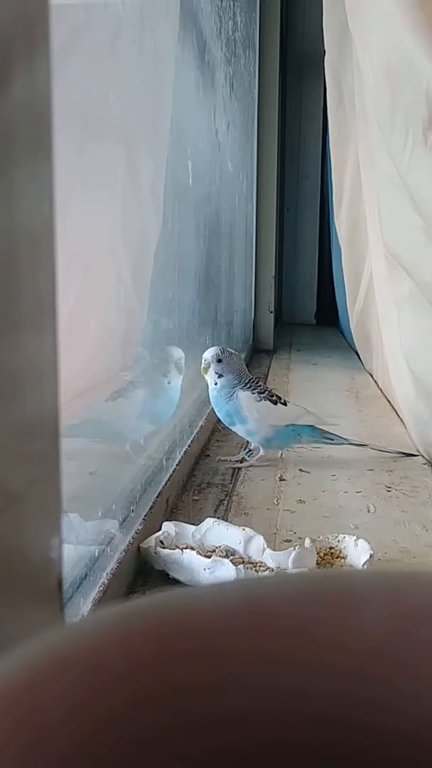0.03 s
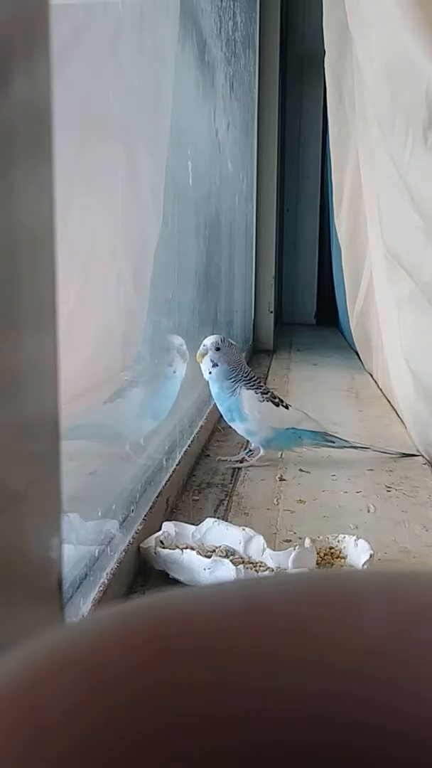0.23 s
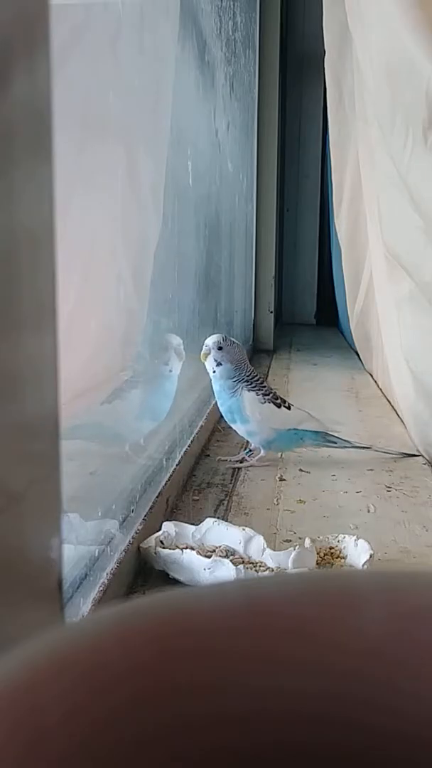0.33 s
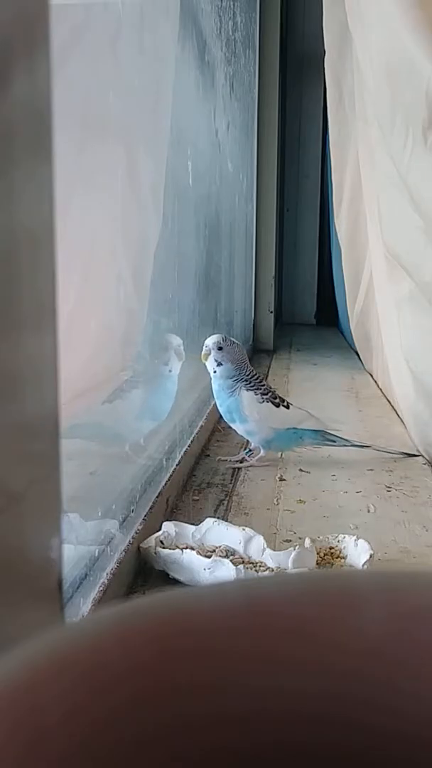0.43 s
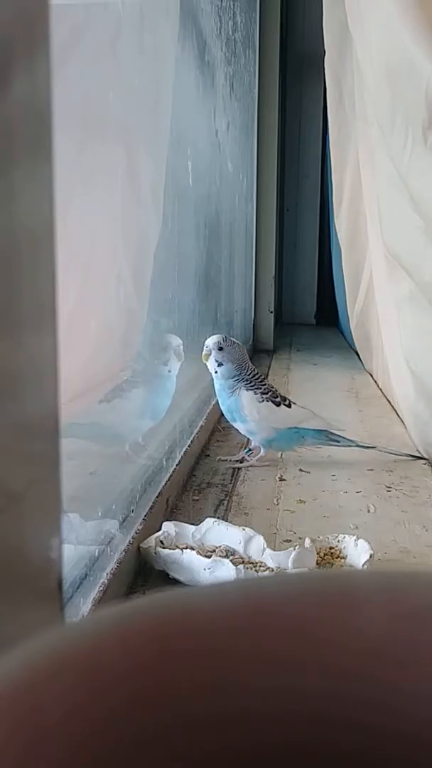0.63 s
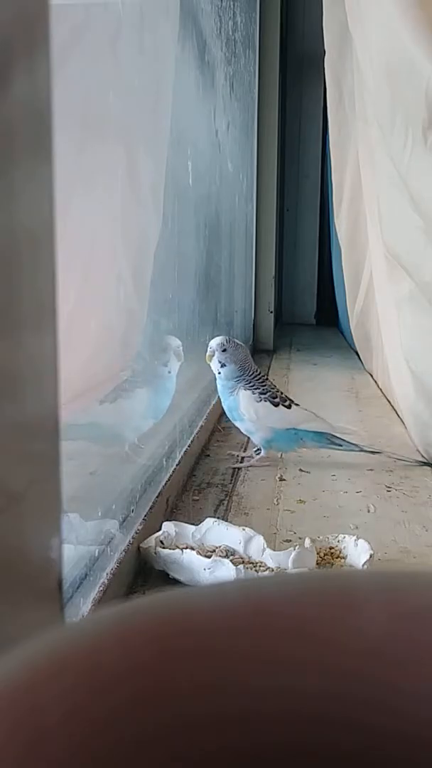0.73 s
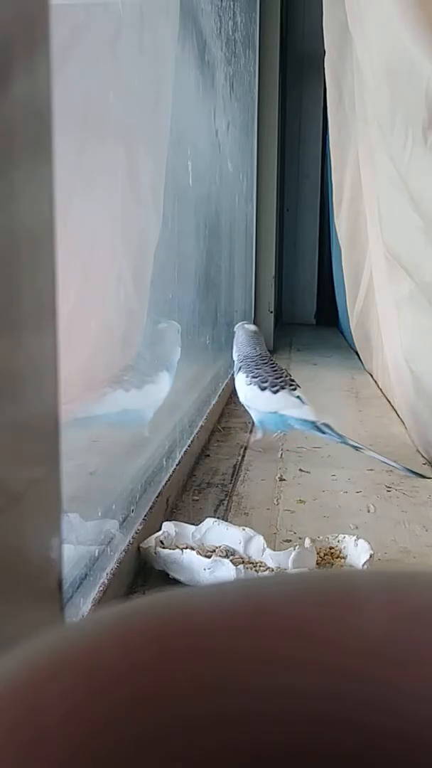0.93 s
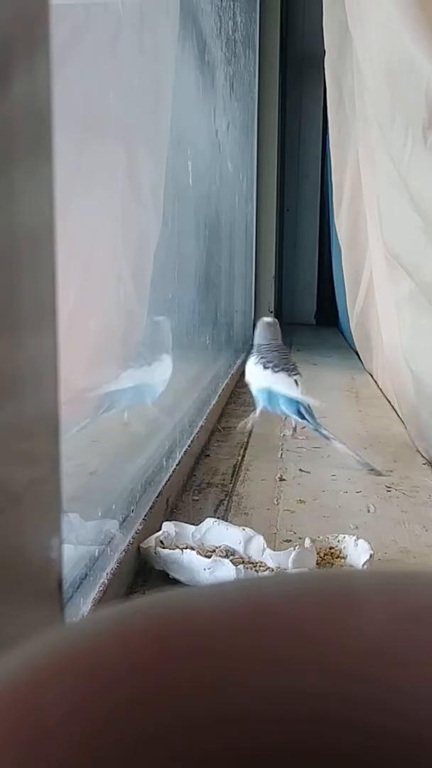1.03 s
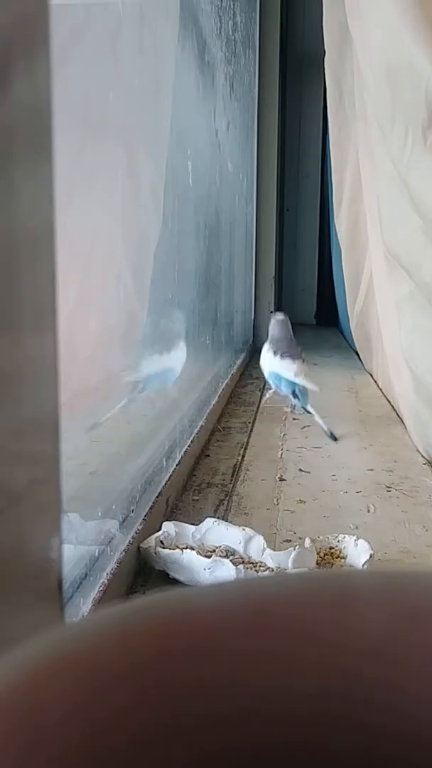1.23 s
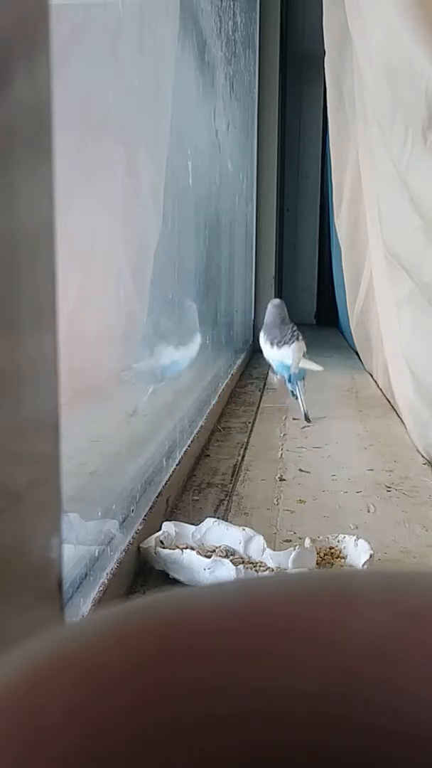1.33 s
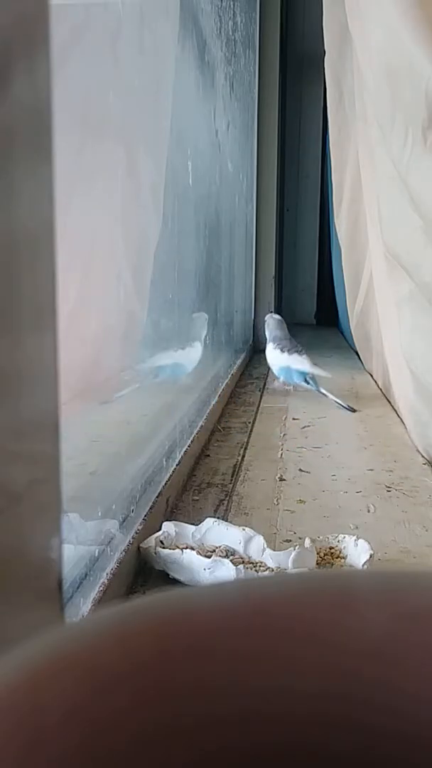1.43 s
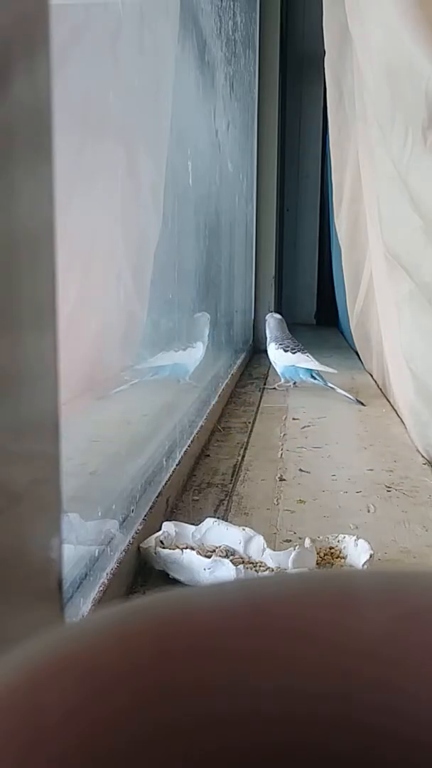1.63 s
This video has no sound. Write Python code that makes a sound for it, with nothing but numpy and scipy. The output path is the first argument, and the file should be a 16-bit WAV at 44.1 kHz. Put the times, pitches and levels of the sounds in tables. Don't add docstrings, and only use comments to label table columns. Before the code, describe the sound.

Two piercing parakeet chirps near the microphone, then faint claw ticks on a window sill.

```python
import sys
import numpy as np
from scipy import signal
from scipy.fft import rfft, irfft
from scipy.io import wavfile
from scipy.ndimage import uniform_filter1d, minimum_filter1d

SR = 44100
rng = np.random.default_rng(int(sys.argv[2]) if len(sys.argv) > 2 else 0)


def to_wav(s):
    ch = np.atleast_2d(s).T
    pcm = np.round(np.clip(ch, -1, 1) * 32767)
    wavfile.write(sys.argv[1], SR, pcm.astype(np.int16))


def level_to_linear(level):
    exponent = np.asarray(level, float) / 20
    return 10 ** exponent


N = 74970


def level(x, db):
    return x * level_to_linear(db) / np.sqrt(np.mean(x ** 2))


def band(x, hz, width_hz):
    return signal.lfilter(*signal.iirpeak(min(hz, .45 * SR), hz / width_hz, fs=SR), x)


def noise_band(n, hz, width_hz):
    return band(band(rng.standard_normal(n), hz, width_hz), hz, width_hz)


def walk(rate_hz):
    k = int(SR / rate_hz)
    steps = np.repeat(rng.standard_normal(N // k + 1), k)
    drift = uniform_filter1d(uniform_filter1d(steps, k), k)[:N]
    return drift / drift.std()


def house():
    # frequency in Hz, level in dB per Hz.
    hiss_spectrum = [(40, -27.5), (240, -6), (1100, -14), (1700, -24.5), (3000, -21.5), (5500, -39),
                     (12500, -40.5), (15500, -51.5)]
    # frequency in Hz, width in Hz, level in dB, flicker in dB.
    hollows = [(240, 53, -75.5, 4), (320.8, 45, -76, 3.5), (1170, 97, -80.5, 9.5), (2150, 230, -81, 4.5),
               (4700, 700, -87, 3.5)]
    # centre in seconds, length in seconds, frequency in Hz, level in dB.
    swells = [(0.019, .05, 1145, -65), (0.047, 0.025, 2256, -67), (0.159, 0.057, 329.3, -59),
              (0.167, 0.023, 918, -67), (0.498, 0.019, 240, -59), (0.546, 0.042, 248, -62.5),
              (.675, 0.016, 323.3, -57), (0.767, 0.063, 238, -51), (0.771, 0.024, 2150, -70.5),
              (.772, .03, 4400, -73.5), (0.839, 0.015, 240, -53), (1.215, 0.011, 873, -56.5),
              (1.258, 0.022, 330, -58), (1.296, 0.02, 243, -54), (1.299, 0.017, 1171, -64.5),
              (1.345, .08, 2157, -68.5), (1.68, 0.062, 1308, -68), (0.739, 0.04, 1137, -73),
              (0.312, 0.054, 328.6, -65), (1.236, 0.097, 81.5, -86.5), (1.477, 0.0059, 1129, -51),
              (1.46, 0.046, 80.3, -76), (1.502, 0.029, 83, -81), (1.518, 0.025, 331, -57),
              (1.59, 0.016, 2040, -60.5), (1.64, 0.087, 2133, -68), (1.636, 0.1, 76.8, -73.5),
              (1.632, 0.088, 125, -71)]
    swell_flicker_db, swell_sway_s = 2, .0002

    t = np.arange(N) / SR
    floor_hz, floor_db = np.array(hiss_spectrum).T
    hiss = 0
    for hz in 45 * 2 ** np.arange(0, 8.6, .5):
        band_db = np.interp(np.log(hz), np.log(floor_hz), floor_db) + 10 * np.log10(hz)
        hiss = hiss + level(noise_band(N, hz, hz / 2), band_db) * level_to_linear(1.2 * walk(36))
    out = level(hiss, -71)
    for hz, width_hz, db, flicker_db in hollows:
        out = out + level(noise_band(N, hz, width_hz) * level_to_linear(flicker_db * walk(4.5)), db)
    for s, length_s, hz, db in swells:
        gain = level_to_linear(db + swell_flicker_db * walk(60)) * np.exp(-(2 * (t - s) / length_s) ** 2)
        out = out + gain * np.sin(2 * np.pi * hz * (t + swell_sway_s * walk(43)))
    return out


def ring(modes):
    t = np.arange(int(SR / 4)) / SR
    out = 0
    for hz, db, t60_s in modes:
        decay = np.exp(-np.log(1000) * t / t60_s)
        onset = (1 - np.exp(-t * hz / 2)) ** 2
        out = out + level_to_linear(db) * np.sin(2 * np.pi * hz * t) * decay * onset
    return out / 2


def taps():
    # start in seconds, peak in dB, brightness from 0 (board) to 1 (claw).
    tap_events = [
        (1.103, -58, .95),
        (1.218, -61, .8),
        (1.283, -54, .95),
        (1.398, -57, .05),
        (1.4365, -36, 0.0),
        (1.4440, -48, 0.0),
        (1.4685, -45, .5),
        (1.478, -54, 0.0),
        (1.499, -57, .2),
        (1.599, -66, .9),
    ]
    # frequency in Hz, level in dB, t60 in seconds.
    sill_modes = [(488, -12, .13), (1100, -14, .07), (1560, -12, .03), (1900, -5, .02), (2250, -4, .02),
                  (2700, 3, .01), (3300, -2, .01), (4000, 0, .01)]
    # frequency in Hz, level in dB, t60 in seconds.
    claw_modes = [(4400, -3, .008), (4650, -15, .12), (4950, -11, .22), (5200, -5, .012), (7500, -12, .008),
                  (14000, -4, .006), (15200, -6, .006)]
    contact_s, scrape_s, scrape_share = .00003, .022, .06

    out = np.zeros(N + SR)
    sill, claw = ring(sill_modes), ring(claw_modes)
    t = np.arange(2000) / SR
    contact = np.exp(-(t / contact_s - 2) ** 2)
    for s, db, bright in tap_events:
        scrape = rng.standard_normal(len(t)) * np.exp(-t / scrape_s) * scrape_share
        hit = signal.fftconvolve((1 - bright) * sill + bright * claw, scrape + contact)
        start = int(s * SR)
        out[start:start + len(hit)] += level_to_linear(db) * hit / np.abs(hit).max()
    return out[:N]


def colour(hz):
    # frequency in Hz, gain in dB.
    throat_curve = [(1050, -30), (1350, -14), (5400, 12.5), (7000, -6), (11000, -7), (12700, -24.5),
                    (14500, -1), (16000, -7.5)]
    curve_hz, db = np.array(throat_curve).T
    return np.interp(np.log(hz), np.log(curve_hz), db)


def smooth(x):
    return uniform_filter1d(x, size=40)


def whistle(notes, tones, unsteady, hiss_db, rough_db, wear):
    wear_kinds = {"growing": (-.7, 1), "rough": (1, 0), "clean": (.1, 0)}
    settled_s = .025
    flutter_db, rasp_db, grain_db = 1.5, -19, 8
    bright_db, top_db = [3, -4], [-6, 6]

    t = np.arange(N) / SR
    wobble, flutter, rasp = walk(300), walk(330), walk(1500)
    bin_hz = np.arange(1, N // 2 + 2) * SR / N
    air = rfft(rng.standard_normal(N)) * level_to_linear(colour(bin_hz)) / (1 + (4200 / bin_hz) ** 6)
    hiss = level(irfft(air, N), hiss_db)
    grain_start, grain_growth = wear_kinds[wear]
    out = 0
    for note, low_db, high_db in zip(notes, bright_db, top_db):
        s, hz, db = np.array(note).T
        glide_hz = np.interp(t, s, hz)
        age = (t - s[0]) / settled_s
        pitch_hz = smooth(glide_hz) * (1 + .008 * wobble * (1 + unsteady * (glide_hz < 2800)))
        phase = 2 * np.pi * np.cumsum(pitch_hz) / SR

        depth_db = flutter_db + rough_db * np.clip(age - .5, 0, 1)
        sounding = (t > s[0]) * (t < s[-1])
        gain = smooth(level_to_linear(np.interp(t, s, db) + depth_db * flutter) * sounding)

        worn = np.clip(grain_start + grain_growth * age, 0, 1)
        slide = np.clip(np.abs(smooth(np.gradient(glide_hz))) * SR / 60000, 0, 1)
        over = 0
        for multiple, tone_db in tones:
            chirp_db = (low_db if multiple < 4 else high_db) * (unsteady > 1)
            slide_db = -20 * slide * (multiple < 1)
            tone_gain = level_to_linear(tone_db + chirp_db + colour(multiple * pitch_hz) + slide_db)
            over = over + tone_gain * np.sin(multiple * phase)
        voice = np.sin(phase) + over * (1 + 2 * level_to_linear(-17.5) * rasp)
        rasped = voice * (1 + level_to_linear(rasp_db + grain_db * worn) * rasp)
        out = out + gain * (rasped + hiss * (.2 + worn))
    return out


def side_tones():
    # centre in seconds, length in seconds, frequency in Hz, level in dB.
    side_events = [
        (.216, .004, 1880, -44),
        (.225, .006, 1850, -36),
        (.233, .005, 1820, -44),
        (.245, .009, 1370, -35),
        (.245, .012, 2010, -33),
        (.244, .007, 4030, -25),
        (.957, .011, 1800, -42),
        (.980, .012, 2050, -32),
        (.979, .008, 4800, -40),
    ]
    t = np.arange(N) / SR
    out = 0
    for s, length_s, hz, db in side_events:
        out = out + level_to_linear(db) * np.exp(-(2 * (t - s) / length_s) ** 2) * np.sin(2 * np.pi * hz * t)
    return out


def bird():
    # time in seconds, pitch in Hz, level in dB.
    fall = [
        [(.212, 3200, -52), (.217, 3350, -25), (.229, 3620, -10), (.235, 3150, -18), (.240, 2760, -8),
         (.246, 2640, -12), (.255, 2680, -19), (.261, 2600, -18), (.263, 2400, -30)],
        [(.940, 3200, -50), (.944, 2950, -34), (.949, 3340, -17), (.957, 3570, -21), (.964, 3550, -8),
         (.974, 2840, -11), (.983, 2715, -1), (.988, 2710, -8), (.993, 2650, -30)],
    ]
    low = [
        [(.261, 2450, -30), (.265, 2080, -13), (.269, 1870, -8), (.274, 1730, -9), (.2765, 1800, -28),
         (.280, 1880, -7), (.2825, 1850, -26), (.285, 1820, -15), (.293, 1850, -32)],
        [(.997, 2600, -32), (1.001, 2340, -10), (1.004, 2050, -14), (1.007, 1890, -8), (1.011, 1850, -23),
         (1.015, 1900, -13), (1.021, 1900, -24), (1.027, 1830, -21), (1.032, 1820, -36)],
    ]
    join = [
        [(.249, 4050, -36), (.251, 4030, -12), (.257, 3800, -19), (.2595, 3730, -5), (.262, 3760, -17),
         (.272, 3630, -11), (.276, 3590, -24), (.281, 3680, -10), (.286, 3620, -26)],
        [(.982, 4000, -38), (.985, 4050, -14), (.990, 3670, -10), (.996, 3280, -14), (1.001, 3240, -22),
         (1.007, 3800, -19), (1.013, 3750, -16), (1.019, 3650, -18), (1.022, 3600, -34)],
    ]
    turn_down = [
        [(.283, 3650, -29.5), (.286, 3400, -7), (.289, 2980, -16.5), (.296, 2850, -10), (.301, 2760, -5.5),
         (.304, 2700, -33.5)],
        [(1.020, 3400, -32), (1.023, 3200, -16.5), (1.028, 2780, -20.5), (1.034, 2980, -11), (1.038, 3000, -20),
         (1.041, 2950, -27)],
    ]
    close = [
        [(.301, 3650, -35), (.305, 3659, -7.5), (.312, 3674, -1.5), (.316, 3651, -12), (.329, 3495, -11),
         (.334, 3650, -9), (.340, 3720, -4.5), (.346, 3638, -18.5), (.362, 3600, -28.5)],
        [(1.038, 3369, -29), (1.041, 3545, -11.5), (1.049, 3652, -12.5), (1.060, 3582, -13), (1.075, 3554, -17),
         (1.090, 3607, -19.5), (1.100, 3490, -38.5)],
    ]
    # multiple of the pitch, level in dB.
    fall_tones = [(.5, -31.5), (2, -41), (3, -47), (4, -54), (5, -53), (6, -57)]
    join_tones = [(2, -34.5), (3, -43.5), (4, -55.5)]
    close_tones = [(.5, -39), (2, -35.5), (3, -43), (4, -52)]

    song = whistle(fall, fall_tones, unsteady=1.3, hiss_db=-50, rough_db=2, wear="growing")
    song = song + whistle(low, fall_tones[1:], unsteady=1.1, hiss_db=-45, rough_db=1.5, wear="rough")
    song = song + whistle(turn_down, join_tones, unsteady=.8, hiss_db=-44.5, rough_db=3, wear="rough")
    song = song + whistle(join, join_tones, unsteady=1.5, hiss_db=-41.5, rough_db=3, wear="rough")
    song = song + whistle(close, close_tones, unsteady=.8, hiss_db=-48.5, rough_db=1.5, wear="clean")
    beak = signal.butter(6, 1480, "high", fs=SR, output="sos")
    song = signal.sosfilt(beak, song)
    return song + side_tones() - .85 * band(song, 12600, 1500)


def room(x):
    # delay in seconds, level in dB.
    early = [(.0013, -13), (.0071, -13), (.0112, -15), (.0143, -16), (.0212, -17)]
    # frequency in Hz, t60 in seconds, level in dB.
    tail_bands = [(516.6, 0.11, -6.5), (1900, 0.32, -9), (2700, 0.38, -2.5), (3650, 0.28, 0),
                  (4400, .2, -4), (5560, 0.16, 1.5), (11300, 0.1, -3.5), (14500, 0.25, 4)]
    tail_db, gap_s = -24, .018

    t = np.arange(int(.7 * SR)) / SR
    room_hz, room_t60_s, room_db = np.array(tail_bands).T
    tail = 0
    for hz in 300 * 2 ** np.arange(0, 5.8, 1 / 3):
        t60_s = np.interp(hz, room_hz, room_t60_s)
        gain = level_to_linear(np.interp(hz, room_hz, room_db)) / np.sqrt(t60_s)
        tail = tail + noise_band(len(t), hz, hz / 3) * gain * np.exp(-np.log(1000) * t / t60_s)
    tail = tail * (1 - np.exp(-t / gap_s))
    response = level_to_linear(tail_db) * tail / np.sqrt(np.sum(tail ** 2)) * 3
    response[0] += 1
    for k, (s, db) in enumerate(early):
        response[int(s * SR)] += (-1) ** k * level_to_linear(db)
    return signal.fftconvolve(x, response)[:N]


def scene():
    return (room(level_to_linear(1.0) * bird() + taps()) + house())[None]


def top_cut(x):
    return signal.sosfilt(signal.butter(12, 15910, fs=SR, output="sos"), x)


def record(dry):
    # start in seconds, level in dB.
    overload_ticks = [
        (0.2688, -21.5),
        (.9834, -28),
    ]
    ceiling = .96
    crest = -minimum_filter1d(-np.abs(dry), size=161)
    mix = dry * uniform_filter1d(np.minimum(1, ceiling / crest), size=121)
    for s, db in overload_ticks:
        start = int(s * SR)
        mix[:, start:start + 9] += level_to_linear(db - 0.5) * np.hanning(9)
    return top_cut(mix)


dry = scene()
out = record(dry)
to_wav(out)
```